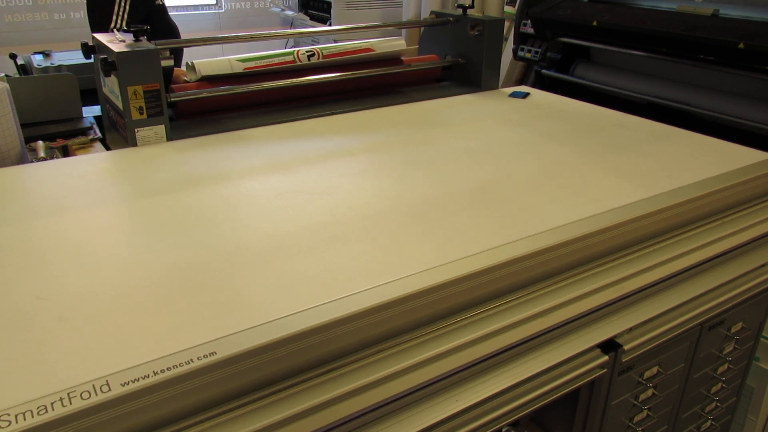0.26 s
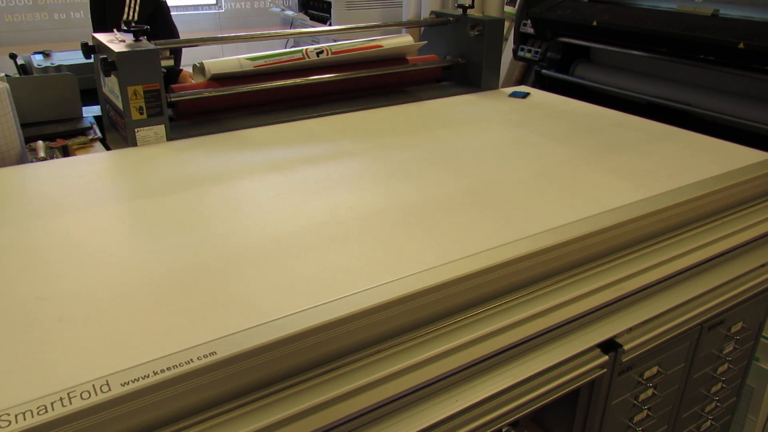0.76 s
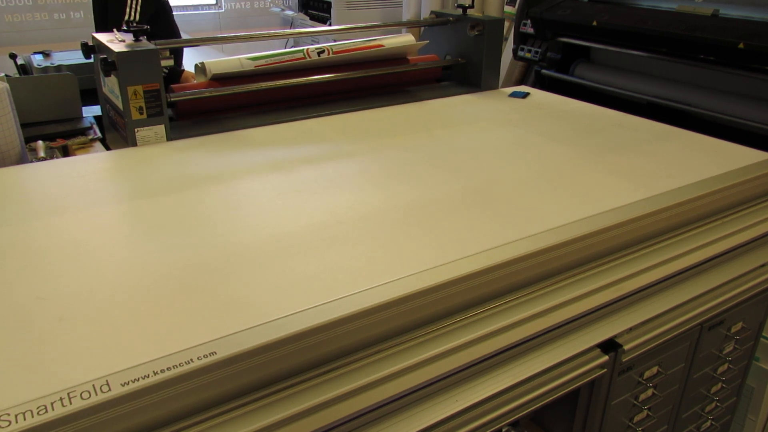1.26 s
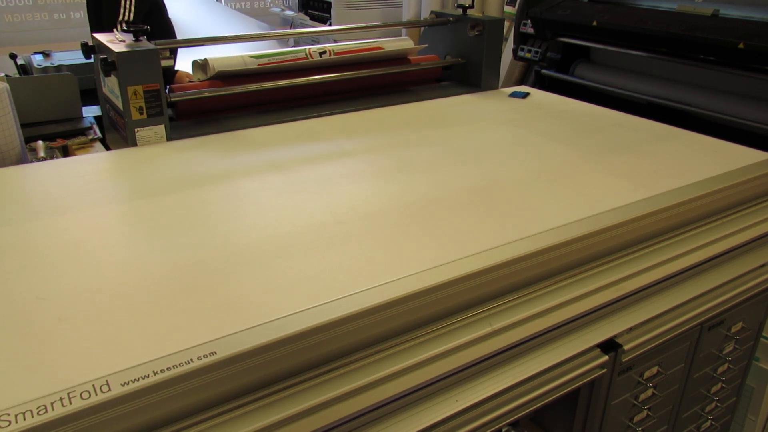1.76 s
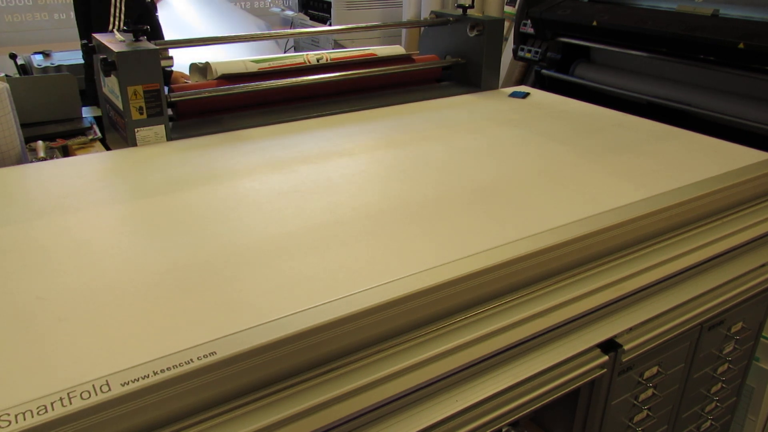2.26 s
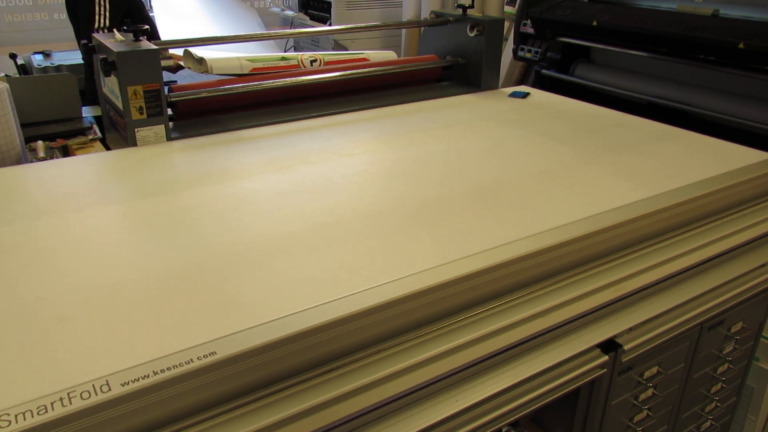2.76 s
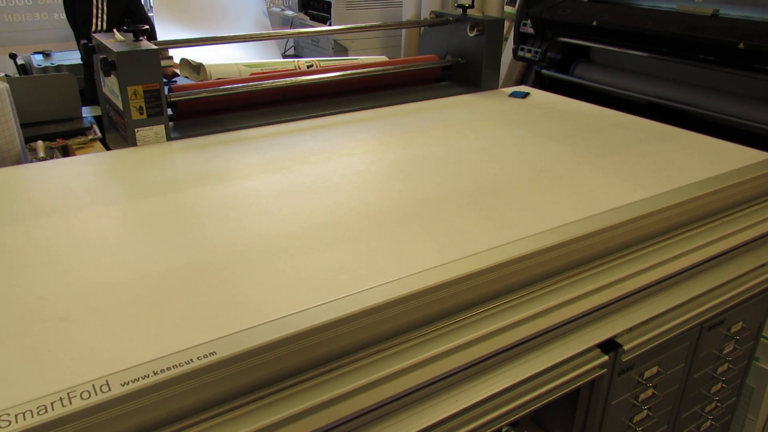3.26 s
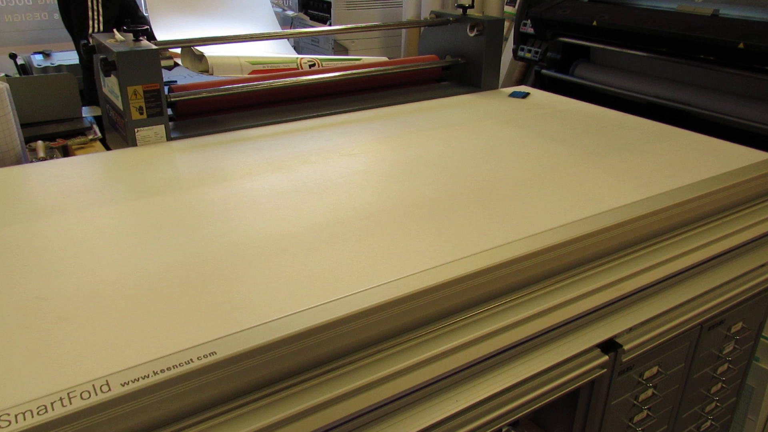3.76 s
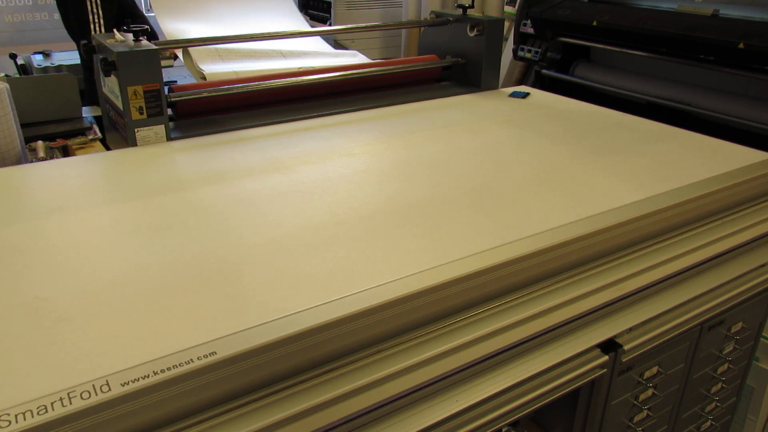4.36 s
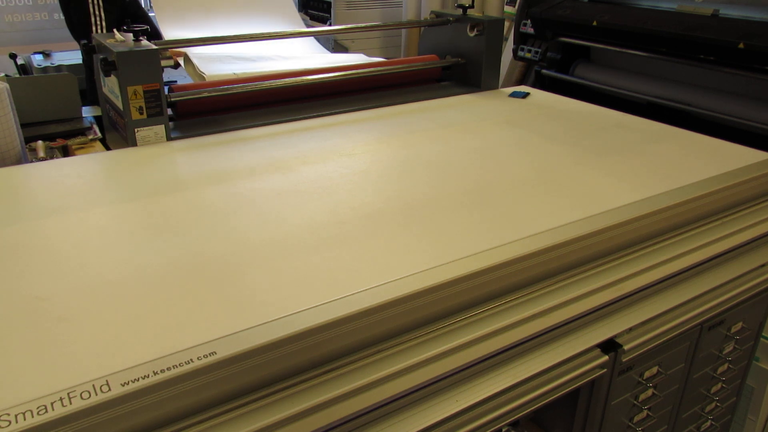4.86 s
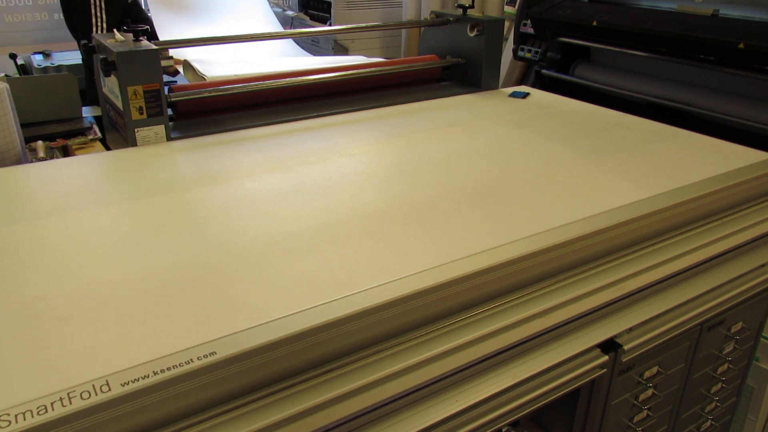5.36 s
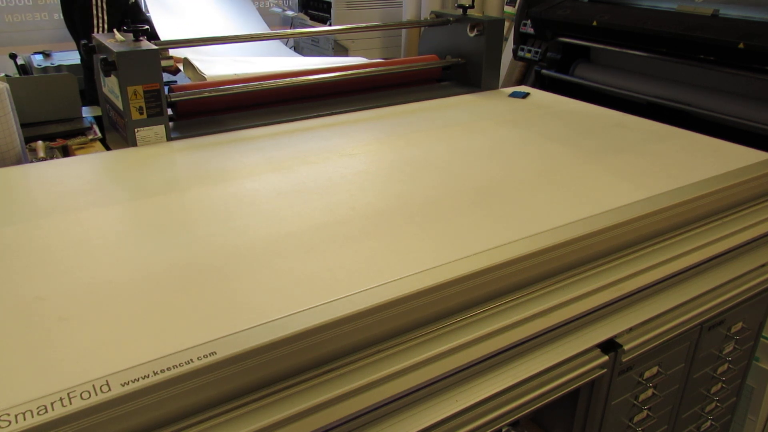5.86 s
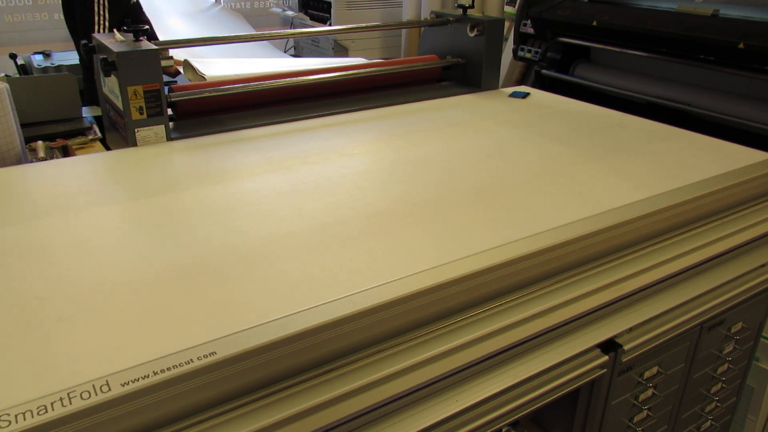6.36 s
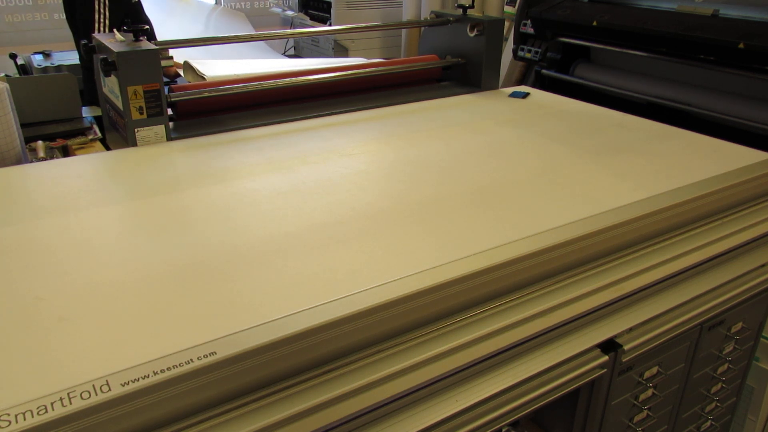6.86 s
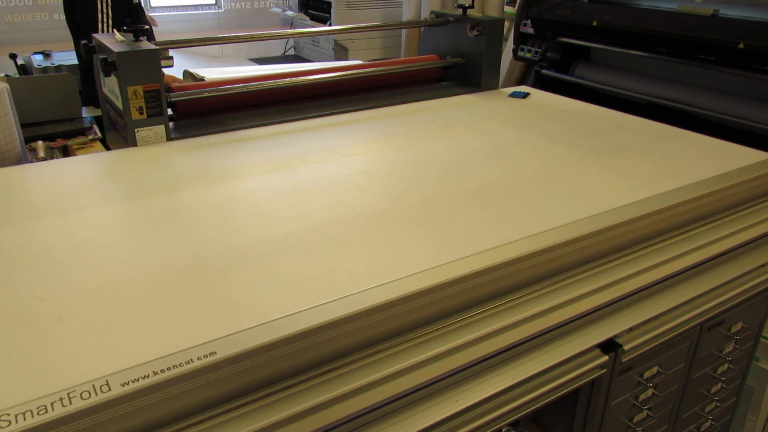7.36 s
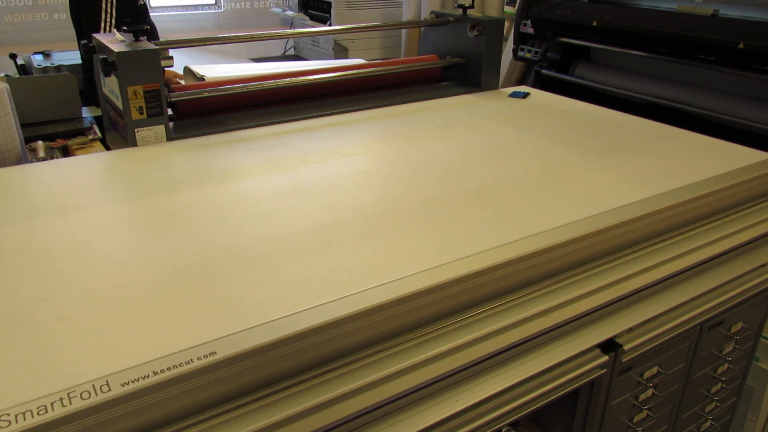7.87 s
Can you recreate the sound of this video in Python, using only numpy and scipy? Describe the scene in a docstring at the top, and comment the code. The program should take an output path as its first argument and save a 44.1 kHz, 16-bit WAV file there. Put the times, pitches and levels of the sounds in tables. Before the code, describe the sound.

Steady low workshop machine hum while a stiff roll of sheet slides, knocks and clanks on a machine, ending in a loud flurry of flapping.

```python
"""In a sign workshop, motors and a fan hum while a roll of stiff sheet is loaded behind a laminator.
The sheet (shaped noise) slides, snaps and flaps: each movement swells over its own rise and dies at a set rate.
The roll knocks on the machine (noise bursts), hard contacts tick, and a metal shaft clanks once (decaying modes).
The frame and bench ring after some blows, and a hard-walled room echoes every knock and tick.
Tones, two beating motors and filtered air noise make the machine background."""
import sys
import numpy as np
from scipy import signal
from scipy.fft import rfft, irfft, next_fast_len
from scipy.io import wavfile
from scipy.ndimage import map_coordinates

SR = 44100
rng = np.random.default_rng(int(sys.argv[2]) if len(sys.argv) > 2 else 0)


def dump_mix(stems):
    """Bounce the given channels to the path in sys.argv[1] as a 16-bit WAV at rate SR."""
    frames = np.atleast_2d(stems).T  # one column per channel
    limited = np.clip(frames, -1, 1)  # hard clip at full scale
    pcm = np.round(limited * 32767).astype(np.int16)
    wavfile.write(sys.argv[1], SR, pcm)


N = 357210
TIME = np.arange(N) / SR  # s

# pushes and pulls: (time of peak [s], rise [s], sliding hiss level [dB], bending crackle level [dB])
STROKES = [(0.0, .05, -55, -63), (.5, 0.19, -52, -51.5), (0.869, 0.19, -43, -42), (1.17, 0.034, -59, -67),
           (1.31, 0.039, -52, -56), (1.41, .07, -50.5, -60), (1.53, 0.21, -53, -47.5),
           (2.02, 0.19, -52, -74), (2.22, .08, -57, -60), (3.76, 0.08, -47, -37), (4.2, .1, -42, -40.5),
           (4.57, 0.12, -50.5, -52), (4.645, 0.089, -53, -41), (7.131, 0.087, -36.5, -35.5),
           (7.22, .06, -54, -37.5), (7.34, 0.19, -53, -35), (7.59, 0.34, -54, -43.5),
           (7.85, 0.061, -65, -51), (8.05, 0.052, -53.5, -43.5)]
# the sheet catches on the roller: (time of peak [s], rise [s], level [dB])
DRAGS = [(3.78, 0.078, -41.5), (4.19, 0.047, -41), (7.15, 0.099, -45), (7.31, .03, -50)]
# the whole sheet swings: (time of widest swing [s], rise [s], level [dB])
FLAPS = [(.86, 0.16, -44.5), (2.12, 0.18, -46), (2.6, .2, -38.5), (3.0, .2, -45), (3.59, .04, -40),
         (7.3, 0.21, -28), (7.72, 0.2, -39), (8.06, 0.1, -36.5)]
# deep puffs of air pushed by wide swings: (time of peak [s], rise [s], level [dB])
PUFFS = [(.88, .06, -44), (7.38, 0.089, -34.5)]
# the sheet is in hand: (start [s], end [s])
HELD = [(0, 3.02), (3.52, 5.23), (6.899, 8.1)]
# relative spectrum of the sliding hiss: (frequency [Hz], density [dB per Hz])
HISS_SPECTRUM = [(500, -59), (1200, 9.5), (2500, 2.5), (4500, -1), (7500, 0), (11000, -3), (15000, -9)]
# relative spectrum of the bending crackle: (frequency [Hz], density [dB per Hz])
CRACKLE_SPECTRUM = [(100, -3.5), (300, 3.5), (950, 2), (1600, 1), (2500, -10), (4000, -16), (9000, -41)]
# relative spectrum of the rasp on the roller: (frequency [Hz], density [dB per Hz])
RASP_SPECTRUM = [(900, -22), (1600, -34), (2100, 3.5), (2700, 1), (3500, -14), (6000, -8), (12000, -34)]
# relative spectrum of the flapping rumble: (frequency [Hz], density [dB per Hz])
RUMBLE_SPECTRUM = [(25, -32), (50, -6.5), (85, 0.5), (150, 2), (200, -6), (290, 7.5), (370, -9.5), (500, 3),
                   (1000, -15.5), (3000, -59)]
# relative spectrum of the air puff: (frequency [Hz], density [dB per Hz])
PUFF_SPECTRUM = [(25, -25), (45, -4.5), (80, 14), (110, -1), (200, -46)]
# stereo width of the sheet noise: (frequency [Hz], side-to-mid ratio [dB])
SHEET_WIDTH = [(100, -15), (400, -9), (1300, -12), (2400, -41), (4400, -29), (8000, -5.5), (13000, -2)]
STROKE_FALL, DRAG_FALL, FLAP_FALL = 111, 108, 47  # decay rates [dB per s]; puffs share the strokes' rate
STIR_HISS_DB, STIR_CRACKLE_DB, STIR_RUMBLE_DB = -65, -56, -52  # faint stirring of the held sheet
SETTLE_DB_PER_S = 22  # the stirring dies once the sheet is let go


def sheet():
    """Friction and bending noise: it slides, crackles, rasps on the roller, rumbles and puffs as it flaps."""
    s, rise, hiss_db, crackle_db = np.transpose(STROKES)
    stir = np.max([(TIME >= start) * fade(end, SETTLE_DB_PER_S) for start, end in HELD], axis=0)

    slide = swells(zip(s, rise, hiss_db), STROKE_FALL, amp(STIR_HISS_DB) * stir)
    hiss = slide * amp(1.2 * wander(30)) * rush(HISS_SPECTRUM, SHEET_WIDTH, grain_db=1)

    bend = swells(zip(s, rise, crackle_db), STROKE_FALL, amp(STIR_CRACKLE_DB) * stir)
    crackle = bend * amp(1.5 * wander(40)) * rush(CRACKLE_SPECTRUM, SHEET_WIDTH, grain_db=2.0)

    drag = swells(DRAGS, DRAG_FALL)
    rasp = drag * amp(1.6 * wander(50)) * rush(RASP_SPECTRUM, SHEET_WIDTH, grain_db=2.0)

    swing = swells(FLAPS, FLAP_FALL, amp(STIR_RUMBLE_DB) * stir)
    rumble = swing * amp(1.8 * wander(22)) * rush(RUMBLE_SPECTRUM, WIDTH)

    puff = swells(PUFFS, STROKE_FALL) * rush(PUFF_SPECTRUM, WIDTH)
    return hiss + crackle + rasp + rumble + puff


# the roll and sheet strike the machine: (time [s], level [dB], bass change [dB],
# treble slope [dB per octave], contact time [s], direct sound relative to echo gain [dB])
KNOCKS = [(0.644, -34.5, -9.5, -19, .003, 10), (1.886, -41.5, 3, -1.5, 0.02, 0),
          (2.059, -41.5, 21.5, -2, .02, 1.5), (2.097, -24.5, -1.5, -6, .009, -5.5),
          (2.449, -36.5, 15.5, -6.5, 0.01, -0.5), (2.502, -26, -10, -1.7, 0.0066, -2.5),
          (2.71, -27.5, 2.5, -22, .0045, -10), (3.523, -30, 7, -3, 0.0033, 2),
          (3.532, -17.5, -10, 0.4, 0.006, 3), (3.815, -14, -14.5, -2, 0.015, -3.5),
          (5.006, -26.5, 8.5, -23.5, 0.0055, 3), (5.229, -42, 15, -21, 0.011, 4.5),
          (6.892, -19.5, -2, -18.5, .0085, 2.5), (7.02, -36.5, 16.5, -8, 0.01, -1),
          (7.152, -22, 6, -8.5, 0.0057, 3), (7.251, -20, 3, -28, 0.0048, 12),
          (7.286, -19, -17, -16.5, 0.011, 6), (7.333, -16.5, -7.5, -18, 0.0073, 3.5),
          (7.595, -30, 14, -10, 0.012, -2.5), (7.766, -33, 12.5, -21, 0.0053, -5)]
# colour shared by all blows: (frequency [Hz], gain [dB])
BLOW_COLOUR = [(35, -10), (90, -19), (150, 4.5), (200, -1), (310, 6), (550, 5), (1000, -1), (1600, 0),
               (2500, -2.5), (4000, -6), (7000, -6), (11000, -11.5), (15000, -17)]


def knocks(burst_db=0.5, ripple_db=2.5):
    """Impact: contact time sets the length of a spiky burst and the onset of its echo; each has its own tilt."""
    track = np.zeros((2, N))
    for s, db, bass_db, bright, contact, direct_db in KNOCKS:
        contact = max(contact, .001)
        u = TIME[:SR] / contact
        spikes = unit(rng.standard_normal(SR) * amp(burst_db * rng.standard_normal(SR)))
        burst = u ** 2 * np.exp(2 - 2 * u) * spikes  # strongest at u = 1
        sound = room(contact)
        sound[0] += amp(direct_db) * burst

        bumps = rng.standard_normal(400)  # random ripple gives each blow a slightly different colour
        bump_hz = np.linspace(0, SR / 2, len(bumps))

        def colour(hz):
            ripple = ripple_db * np.interp(hz, bump_hz, bumps) * hz / (hz + 700)
            bass = bass_db / (1 + (hz / 620) ** 4)
            treble = bright * np.log2(1 + (hz / 1700) ** 2) / 2
            return along(BLOW_COLOUR, hz) + bass + treble + ripple

        add(track, s, amp(db) * coloured(sound, colour))
    return stereo(track, WIDTH)


# sharp ticks: (time [s], relative level [dB])
CLICKS = [(0.6923, -37), (2.712, -46), (2.89, -59), (3.061, -50), (4.289, -24.5), (4.2928, -23), (4.3, -33),
          (5.011, -42.5)]
# colour shared by all ticks: (frequency [Hz], gain [dB])
TICK_COLOUR = [(100, -3), (500, 16.5), (1100, 6), (2200, 2), (4300, 6), (7000, 2), (11000, -1.5),
               (15000, -16)]


def clicks(direct_db=23, chatter_db=10):
    """Impulse excitation: a hard contact gives a one-sample spike, brief chatter and an echo."""
    track = np.zeros((2, N))
    for s, db in CLICKS:
        sound = room(rise=0.0023)
        chatter = amp(chatter_db - 60 * TIME[:SR] / 0.011)  # falls 60 dB in 11 ms
        sound[0] += chatter * rng.standard_normal(SR)
        sound[0, 0] += amp(direct_db)
        add(track, s, amp(db - 12) * coloured(sound, lambda hz: along(TICK_COLOUR, hz)))
    return stereo(track, WIDTH)


# the sheet pops over: (time [s], relative level [dB])
POPS = [(7.259, -22), (7.404, -28)]


def thuds(low_hz=250, high_hz=450, length_s=0.0066):
    """Buckling: the bowed sheet pops over with a short, hollow push in two bending modes."""
    total = 0
    for s, db in POPS:
        t = TIME - s
        bending = np.sin(2 * np.pi * low_hz * t) + 0.78 * np.sin(2 * np.pi * high_hz * t)
        total = total + amp(db) * np.exp(-(t / length_s) ** 2) * bending
    return total * amp([[1.5], [-1.5]])  # 3 dB louder on the left


# modes of the metal shaft: (frequency [Hz], level [dB], time to fall 60 dB [s])
SHAFT = [(355, -37.5, 1.0), (544, -36, 0.77), (929, -37, 0.79), (959, -33.5, 0.75), (1157, -40.5, 1),
         (1240, -48, 1), (1663, -47.5, 0.99), (2891, -44, .35), (3200, -46, .55), (3445, -44, 0.47),
         (3758, -41.5, .42), (4317, -49, .4), (4570, -49, 0.53), (5588, -43, 0.32), (6600, -46, .32)]


def shaft(struck_s=2.505):
    """Modal vibration: one blow makes the metal shaft clank in its natural modes."""
    return ring(SHAFT, struck_s, blur=.5)


# blows that ring the frame: (time [s], gain on the modes [dB])
JOLTS = [(3.536, -1), (3.825, -1.5)]
# modes of the machine frame: (frequency [Hz], level before the jolt gain [dB], time to fall 60 dB [s])
FRAME = [(1084, -29.5, 0.18), (1523, -34.5, 0.52), (1680, -46, 0.49), (1790, -51, .6), (2000, -34.5, 0.65),
         (2030, -49, 0.49), (2370, -38, 0.7), (2923, -51, 0.45), (3300, -54, 0.45), (3840, -41, 0.46),
         (4170, -46, 0.55), (5992, -51, 0.55), (6721, -50, 0.5), (10864, -53, .3)]


def frame():
    """Modal vibration: two hard blows set the machine's frame ringing."""
    return sum(amp(db) * ring(FRAME, s, blur=0.55) for s, db in JOLTS)


# bumps against the bench: (time [s], gain on the modes [dB])
BUMPS = [(3.539, 4), (5.018, 2), (7.29, 9.5)]
# modes of the bench: (frequency [Hz], level before the bump gain [dB], time to fall 60 dB [s])
BENCH = [(150.3, -43.5, 0.72), (186.7, -32, 0.25), (997, -43, 0.48)]


def bench():
    """Modal vibration: heavy bumps make the bench boom."""
    return sum(amp(db) * ring(BENCH, s, blur=0.79) for s, db in BUMPS)


# motor and fan tones: (frequency [Hz], mean level [dB rms], left-right difference [dB])
HUM = [(48.4, -65.5, 8), (247.4, -47.5, 2.5), (260.1, -57, 4), (489.4, -56, 6.5), (1053, -69.5, -7),
       (1185, -66, 2), (1506, -71, -8), (1490, -70, 0), (1566, -64, -1)]
# relative spectrum of the moving air: (frequency [Hz], density [dB per Hz])
FAN_SPECTRUM = [(25, -32), (45, -15), (70, -23), (120, -13), (300, -5.5), (520, -12), (800, -13),
                (1200, -21.5), (1650, -25), (2300, -31), (4000, -39.5), (9000, -40.5), (13000, -41.5),
                (15000, -49)]
# stereo width of the fan noise: (frequency [Hz], side-to-mid ratio [dB])
FAN_WIDTH = [(60, 11), (130, 6.5), (290, -2), (700, -4.5), (1400, -4), (2400, -7.5), (4400, -6.5),
             (8000, 0.5), (15000, -1.5)]
# resonances of the machine housing: (frequency [Hz], width [Hz], relative level [dB])
HOUSING = [(167.6, 28.3, -2.5), (245.5, 84, -4.5), (375, 51, -9), (503.5, 79, -4)]


def machines():
    """Rotation and cavity resonance: unsteady motor tones, with fan air that booms in its housing."""
    tones = 0
    for hz, db, pan_db in HUM:
        phase = 2 * np.pi * (hz * TIME + rng.random()) + .3 * wander(4)
        level = amp(db + 0.87 * wander(7.6)) * pan(pan_db)
        tones = tones + level * np.sqrt(2) * np.sin(phase)

    def housing(hz):
        total = 0
        for k, (centre, width, db) in enumerate(HOUSING):
            damping = 1j * hz * width
            resonance = damping / (centre * centre - hz * hz + damping)
            total = total + (-1) ** k * amp(db) * resonance ** 2  # neighbours have opposite signs
        return total

    boom = unit(stereo(filtered(rng.standard_normal((2, N)), housing), WIDTH))
    air = amp(-44.5 + .5 * wander(2.32)) * rush(FAN_SPECTRUM, FAN_WIDTH)
    return tones + air + amp(-46.5 + 1.46 * wander(4.91)) * boom


def motors(hz=96.8, db=-54, pan_db=4.5, second_db=-6, beat_s=0.94, dip_s=3.99):
    """Beating: two motors at nearly one speed drift in and out of step; their hum dips at dip_s."""
    first = np.exp(2j * np.pi * (hz * TIME + rng.random()) + .2j * wander(4))
    second = -amp(second_db) * first * np.exp(2j * np.pi * (TIME - dip_s) / beat_s)
    return amp(db) * pan(pan_db) * np.sqrt(2) * (first + second).real


def drone(hz=44, db=-41, pan_db=7.0, hold_s=0.25, fade_db_per_s=65):
    """Phase modulation: a deep tone wavers, holds briefly and fades out."""
    tone = np.sqrt(2) * np.sin(2 * np.pi * hz * TIME + 0.48 * wander(16.5))
    return amp(db) * pan(pan_db) * fade(hold_s, fade_db_per_s) * tone


# reverberation: (frequency [Hz], time to fall 60 dB [s])
ROOM = [(100, 0.59), (400, 0.63), (1500, 0.74), (4000, 0.61), (8000, 0.46), (15000, 0.3)]


def room(rise):
    """Reverberation: a fresh mid and side echo swells over rise seconds and dies by frequency."""
    hz, t, z = signal.stft(rng.standard_normal((2, SR)), SR, nperseg=256)
    decay = amp(-60 * t / along(ROOM, hz)[:, None])
    tail = signal.istft(z * decay, SR, nperseg=256)[1][:, :SR]
    return tail * (1 - np.exp(-TIME[:SR] / rise))


def early_reflections(x, copy_db=-19, corner_hz=1100, count=8):
    """Early reflection: weak random copies within 25 ms, mostly of the treble, roughen the sound."""
    delays = rng.uniform(.003, .025, count)
    signs = rng.choice([-1, 1], count)
    response = np.bincount((delays * SR).astype(int), signs * amp(copy_db))
    copies = signal.fftconvolve(x, response[None], axes=1)[:, :N]
    return x + filtered(copies, lambda hz: hz ** 2 / (hz ** 2 + corner_hz ** 2))


# stereo width of the room sound: (frequency [Hz], side-to-mid ratio [dB])
WIDTH = [(50, -5), (200, -14.5), (600, -9.5), (1200, -12.5), (2300, -20.5), (4400, -15.5), (8000, -4.5),
         (13000, -3)]
# balance of the stereo image: (frequency [Hz], left-right difference [dB])
LEAN = [(40, 5), (120, 4), (300, 4), (600, 1.5), (1200, 1.2), (5000, -0.6), (13000, -0.2)]


def stereo(pair, width):
    """Decorrelation: two unrelated signals become mid and side, then left and right; the bass leans left."""
    mid, side = pair[0], filtered(pair[1], lambda hz: amp(along(width, hz)))
    return filtered(np.array([mid + side, mid - side]), lambda hz: amp(np.outer([.5, -.5], along(LEAN, hz))))


def ring(modes, s, blur):
    """Modal decay: modes start at s and die away, their phases wandering by about blur radians."""
    t = TIME[:SR]
    track, sound = np.zeros((2, N)), 0
    for hz, db, t60 in modes:
        phase = blur * wander(51)[:SR] + 2 * np.pi * rng.random((2, 1))
        sound = sound + amp(db - 60 * t / t60) * np.sin(2 * np.pi * hz * t + phase)
    add(track, s, sound * (1 - np.exp(-t / 0.0048)))
    return stereo(track, WIDTH)


def rush(spectrum, width, grain_db=0):
    """Turbulence and friction: shaped stereo noise of rms 1, in millisecond grains uneven by grain_db."""
    grains = amp(grain_db * wander(900))
    noise = grains * rng.standard_normal((2, N))
    return unit(stereo(filtered(noise, lambda hz: amp(along(spectrum, hz))), width))


def swells(rows, fall_db_per_s, rest=0, rise_db=10):
    """Power addition: (s, rise s, dB) swells gain rise_db over their rise, then die, above a resting gain."""
    power = rest ** 2
    for s, rise, db in rows:
        below_db = np.maximum(rise_db * (s - TIME) / max(rise, .01), fall_db_per_s * (TIME - s))
        power = power + amp(db - below_db) ** 2
    return np.sqrt(power)


def fade(hold_s, db_per_s):
    """Exponential decay: a gain that holds, then dies away."""
    return amp(-db_per_s * np.maximum(TIME - hold_s, 0))


def wander(rate):
    """Random modulation: a smooth curve through rate random knots a second."""
    return map_coordinates(rng.standard_normal(int(N * rate / SR) + 4), [TIME * rate])


def amp(db):
    """Level law: decibels to gain."""
    return 10 ** (np.asarray(db) / 20)


def pan(db):
    """Level difference: left and right gains that lie db apart."""
    return amp(db * np.array([[.5], [-.5]]))


def unit(x):
    """Normalisation: x at rms 1."""
    return x / np.sqrt(np.mean(x ** 2) + 1e-20)


def along(points, hz):
    """Log-frequency interpolation: (Hz, value) points read at hz."""
    f, v = np.transpose(points)
    return np.interp(np.log(hz + 1), np.log(f + 1), v)


def filtered(x, response):
    """Linear filtering: the spectrum of x times a response of frequency."""
    m = next_fast_len(x.shape[-1] + SR // 4)
    spectrum = rfft(x, m) * response(np.fft.rfftfreq(m, 1 / SR))
    return irfft(spectrum, m)[..., :x.shape[-1]]


def coloured(x, colour, size=2048):
    """Minimum phase: x through a causal filter whose dB are colour(Hz), built by folding the cepstrum."""
    cepstrum = irfft(np.log(amp(colour(np.fft.rfftfreq(size, 1 / SR))) + 1e-6))
    cepstrum[1:size // 2] *= 2
    cepstrum[size // 2 + 1:] = 0
    return signal.fftconvolve(x, irfft(np.exp(rfft(cepstrum)))[None], axes=1)


def add(track, s, sound):
    """Superposition: mix a sound into the track at time s."""
    part = track[:, round(s * SR):][:, :sound.shape[1]]
    part += sound[:, :part.shape[1]]


def scene():
    """Superposition: handling of the sheet, ringing metal and bench, and the machines."""
    handling = early_reflections(sheet() + knocks()) + clicks() + thuds()
    ringing = shaft() + frame() + bench()
    return handling + ringing + machines() + motors() + drone()


def record(dry, notch_hz=695, width_hz=80, depth_db=-17, top_hz=15120):
    """Frequency response: the microphone has a hollow in its lower mids and an upper band limit."""
    def response(hz):
        hollow = amp(depth_db / (1 + ((hz - notch_hz) / width_hz) ** 2))
        return hollow * (hz < top_hz)

    return filtered(dry, response)


dry = scene()
out = record(dry)
dump_mix(out)
```